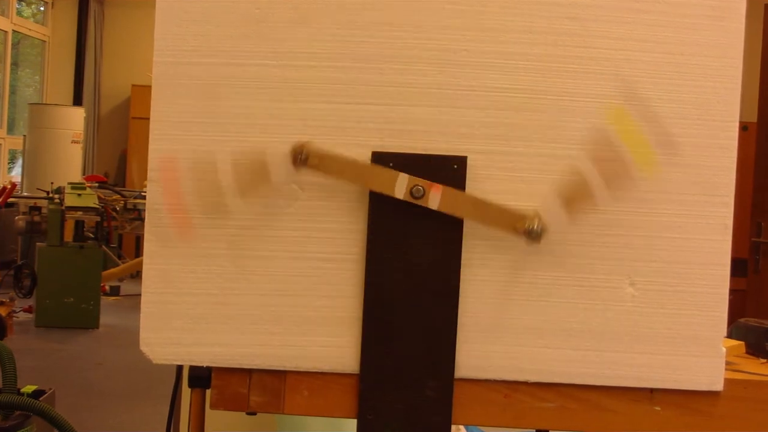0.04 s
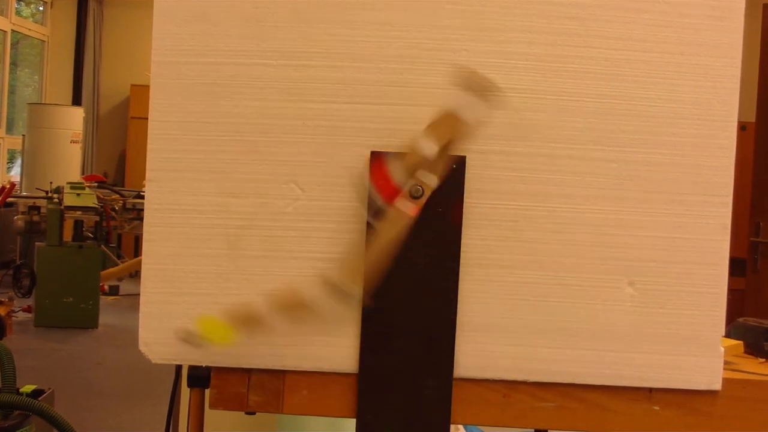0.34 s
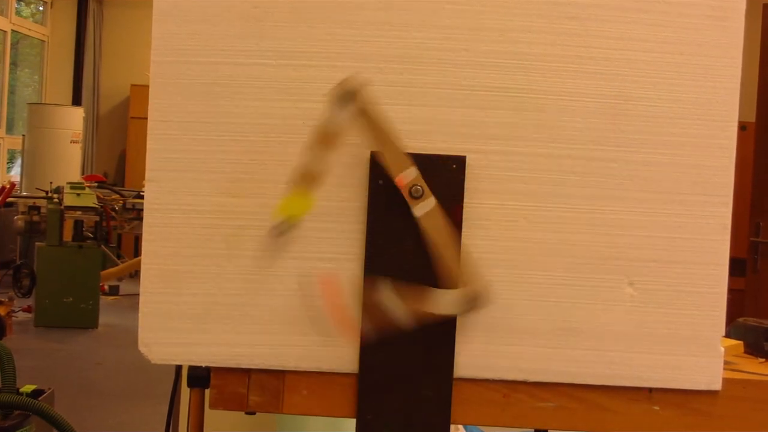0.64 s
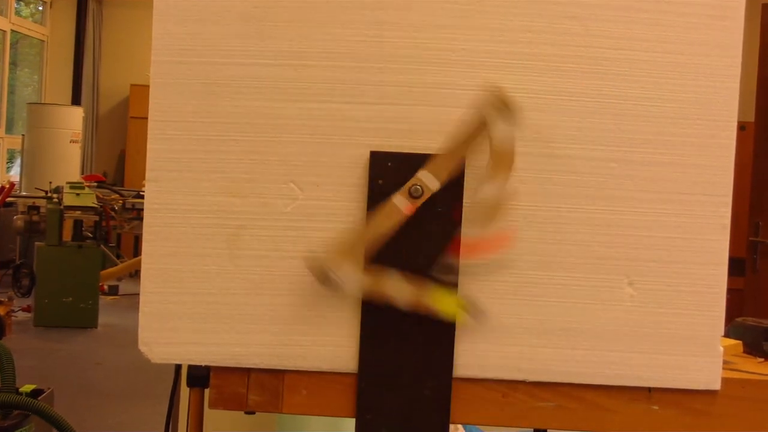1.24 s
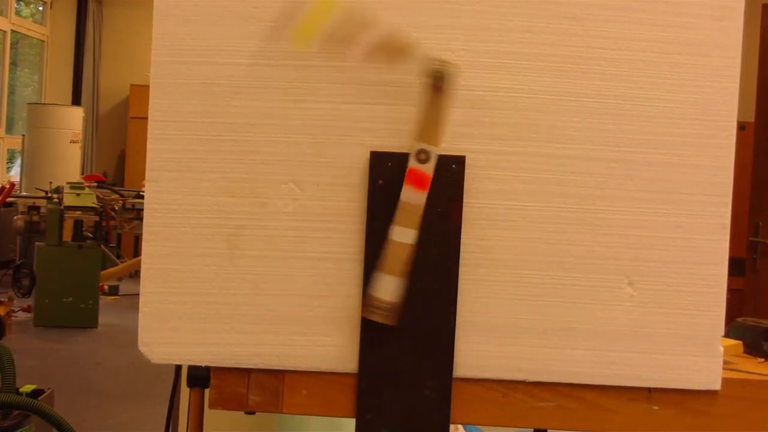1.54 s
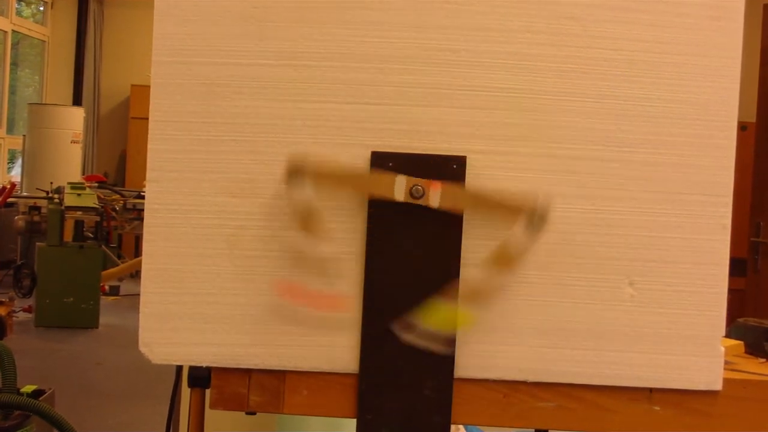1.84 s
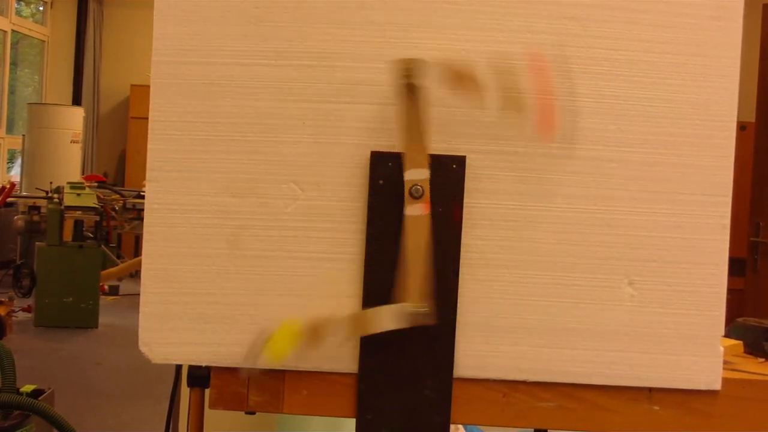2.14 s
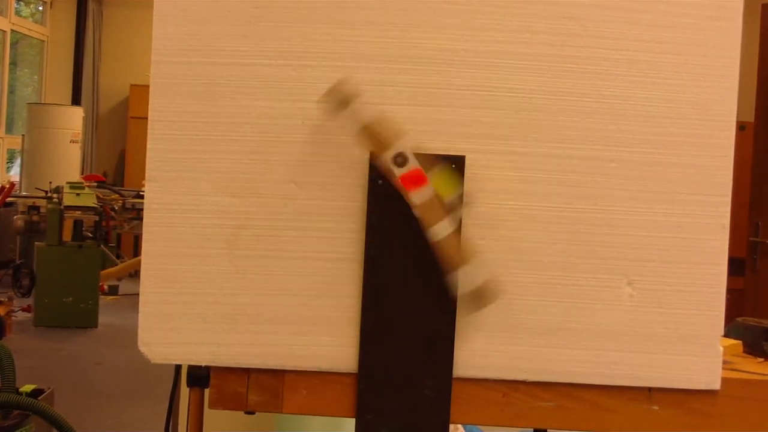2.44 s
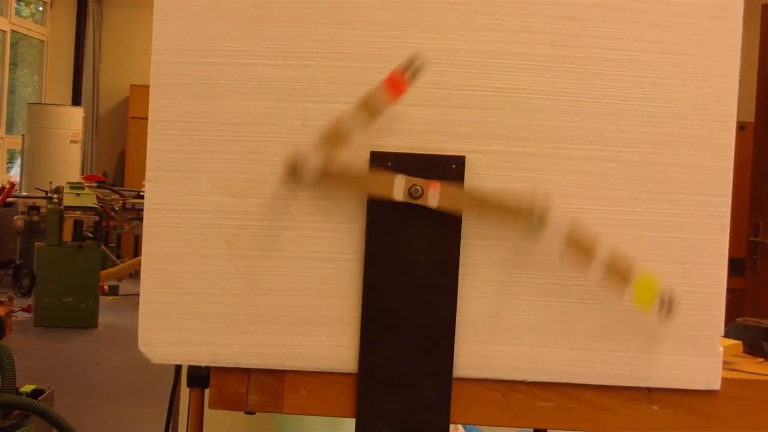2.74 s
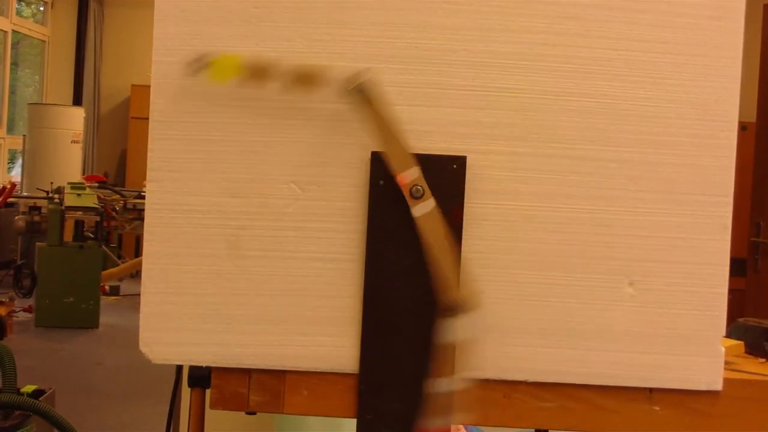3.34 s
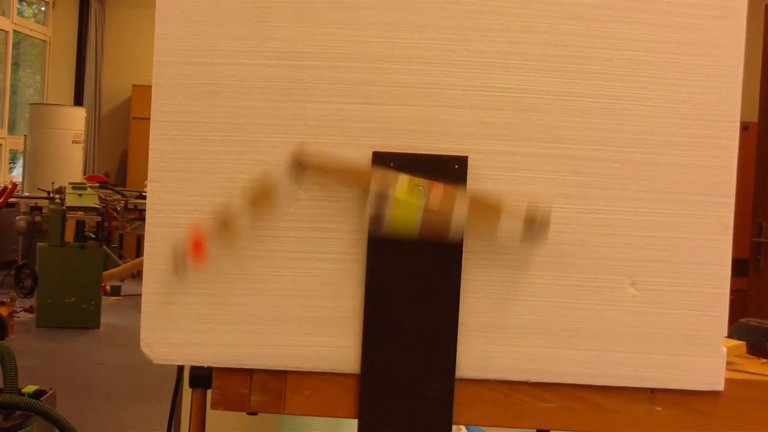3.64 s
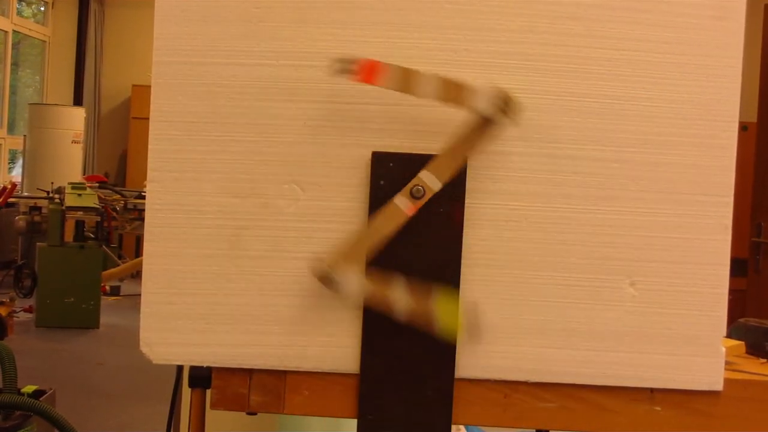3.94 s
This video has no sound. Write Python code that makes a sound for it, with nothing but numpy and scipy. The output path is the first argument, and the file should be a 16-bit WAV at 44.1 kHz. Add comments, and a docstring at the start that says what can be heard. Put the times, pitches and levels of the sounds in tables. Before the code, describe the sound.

A swinging wooden double pendulum ticks and rubs irregularly in a reverberant workshop. It opens on a fading bump, with a low thump at 0.2 seconds. A hollow knock at 0.8 precedes one hard, chattering clack at 0.9. Dull bench thumps come around 1.6 to 1.7. Lighter clicks cluster near 2.4 and 3 seconds, then thin out, leaving a brief rub over faint rumble, hiss, hum and a thin whine.

```python
"""Wooden double pendulum in a workshop

The pendulum swings in a reverberant room: its loose joints tick and rub, its stand rings hollow
when jolted, and the arms clack together once, hard, with a brief chatter. A bump is dying away
at the start and soft thumps shake the bench. Behind are rumble, hiss, hum, a whine and a flutter."""
import sys
import numpy as np
from scipy import signal
from scipy.fft import rfft, irfft
from scipy.io import wavfile

SR = 44100
rng = np.random.default_rng(int(sys.argv[2]) if len(sys.argv) > 2 else 0)


def int16_out(signal):
    """Quantize to a 16-bit WAV file."""
    q = np.round(np.clip(np.atleast_2d(signal).T, -1, 1) * 32767)
    wavfile.write(sys.argv[1], SR, q.astype(np.int16))


N = 176400
TIME = np.arange(N) / SR
HZ = np.maximum(np.arange(N // 2 + 1) * SR / N, 1)


def from_db(db):
    """Decibels to gain."""
    return 10 ** (np.asarray(db) / 20)


def unit(x):
    """Scale to an energy of one."""
    return x / np.sqrt(np.sum(x ** 2) + 1e-20)


def at_hz(points, hz):
    """Read a curve on a log-frequency axis."""
    f, value = np.transpose(points)
    return np.interp(np.log(hz), np.log(f), value)


def colour(x, spectrum):
    """Apply an EQ curve."""
    return irfft(rfft(x) * from_db(at_hz(spectrum, HZ)), N)


def noise(spectrum):
    """Coloured noise, rms one."""
    x = colour(rng.standard_normal(N), spectrum)
    return x / x.std()


def fade(t60):
    """Exponential decay, 60 dB down after t60 seconds."""
    return np.exp(-np.minimum(np.log(1000) * TIME / t60, 40))


def widen(mid, side):
    """Mid and side to left and right."""
    return np.array([mid + side, mid - side])


def pan(stereo, right_db):
    """Raise the right channel and lower the left by as much."""
    return stereo * from_db([[-right_db], [right_db]])


def ringing(modes, size=N, uneven_db=0):
    """Decaying sines of alternating sign; uneven_db varies them as if the blow landed elsewhere."""
    t, out = TIME[:size], 0
    for k, (hz, db, t60) in enumerate(modes):
        envelope_db = db + uneven_db * rng.standard_normal() - np.minimum(60 * t / t60, 300)
        out = out + (-1) ** k * from_db(envelope_db) * np.sin(2 * np.pi * hz * t)
    return out


def strikes(hits, modes, crack, crack_t60, crack_db, ring_db, size):
    """Each contact is a noise crack plus the body's modes, dulled by the softness of the touch."""
    out = np.zeros(N + size)
    grain, decay = noise(crack), fade(crack_t60)[:size]
    for onset_s, db, cutoff_hz in hits:
        burst = from_db(crack_db) * unit(np.roll(grain, rng.integers(N))[:size] * decay)
        ring = from_db(ring_db) * unit(ringing(modes, size, uneven_db=2.5))
        softness = signal.butter(2, cutoff_hz, fs=SR)
        start = int(onset_s * SR)
        out[start:start + size] += from_db(db) * signal.lfilter(*softness, burst + ring)
    return out[:N]


# Room tone, heavy in the lows: f/Hz, relative level/dB
ROOM_TONE_EQ = [(20, 26.5), (35, 28.5), (70, 25), (130, 14), (250, 13), (450, 10), (700, 7), (1200, 5.5),
                (2200, 2), (4000, -4), (7000, -6.5), (10000, -8.5), (15000, -11)]
# Hiss at the sides: f/Hz, relative level/dB
SIDE_HISS_EQ = [(40, 9), (120, 8), (300, 6.5), (1000, 4.5), (3000, -0.5), (7000, 6), (15000, -0.5)]
def room_tone(rumble_db=-49, hiss_db=-61.5):
    """A steady bed: rumble in the centre, faint hiss for width."""
    return widen(from_db(rumble_db) * noise(ROOM_TONE_EQ), from_db(hiss_db) * noise(SIDE_HISS_EQ))


# Whine partials: f/Hz, rms level/dB
WHINE_TONES = [(3934, -71.5), (7867, -63.5), (11800, -75.5)]
# Hum tone: f/Hz, rms level/dB
HUM_TONES = [(179.6, -62)]
def electronics():
    """A thin electronic whine over a low hum, all steady sines."""
    return sum(np.sqrt(2) * from_db(db) * np.sin(2 * np.pi * (hz * TIME + rng.random()))
               for hz, db in WHINE_TONES + HUM_TONES)


# Rhythm of each pulse train: rate/Hz, first t/s, polarity
FLUTTER_RHYTHM = [(29.97, .0112, 1), (29.97, .0245, -1), (29.917, .0018, -1), (29.917, .0182, -1)]
# Pulse shape of each train: peak level/dB, rise/s, fall/s
FLUTTER_PULSES = [(-38.5, 0.00014, 0.0015), (-37, 0.00047, 0.0015), (-45, .001, 0.00042),
                  (-43.5, 0.0013, 0.00042)]
def flutter(uneven_db=2.0):
    """Two cycles, each twitching softly twice a turn, slide slowly towards each other."""
    t, out = TIME[:SR // 20], 0
    for (rate, first, polarity), (db, rise, fall) in zip(FLUTTER_RHYTHM, FLUTTER_PULSES):
        onsets = (np.arange(first, TIME[-1], 1 / rate) * SR).astype(int)
        clicks = np.zeros(N)
        clicks[onsets] = polarity * from_db(db + uneven_db * rng.standard_normal(len(onsets)))
        pulse = (1 - np.exp(-t / rise)) ** 2 * np.exp(-t / fall)
        out = out + signal.fftconvolve(clicks, pulse / pulse.max())[:N]
    low_cut = signal.butter(1, 20, "high", fs=SR, output="sos")
    return signal.sosfilt(low_cut, out)


# Reverb decay: f/Hz, t60/s
REVERB_DECAY = [(100, 0.9), (700, 0.74), (2000, 0.86), (5000, .82), (7500, 0.77), (10500, .5), (15000, 0.7)]
# Reverb tone: f/Hz, level/dB
REVERB_EQ = [(60, 2.5), (300, 3.5), (1000, 2), (2500, -3), (5000, -1), (7000, -1.5), (11000, -4),
             (14000, -9)]
# Reverb width: f/Hz, side level re mid/dB
REVERB_WIDTH = [(100, -22), (500, -20), (1500, -28), (4000, -36), (6500, -10), (10000, -7)]
def workshop_reverb(send, build_s=0.009):
    """Reflections build into a diffuse tail that dies sooner in the high treble."""
    centres_hz = np.linspace(10, 122, 20) ** 2
    band_of_bin = np.rint(np.interp(np.log(HZ), np.log(centres_hz), np.arange(len(centres_hz))))
    spectrum = rfft(rng.standard_normal((2, N))) * from_db(at_hz(REVERB_EQ, HZ))
    build_up = 1 - np.exp(-(TIME / build_s) ** 2)
    tail = 0
    for k, hz in enumerate(centres_hz):
        band = irfft(spectrum * (band_of_bin == k), N)
        tail = tail + band * unit(fade(at_hz(REVERB_DECAY, hz)) * build_up)
    mid, side = signal.fftconvolve(send[None], tail, axes=1)[:, :N]
    return widen(mid, colour(side, REVERB_WIDTH))


# Lingering modes of the bump: f/Hz, level/dB, t60/s
BUMP_MODES = [(77.2, -34.5, 1.05), (94, -52, 0.46), (178, -59, 0.43), (250, -40, 0.66), (357, -51, .6),
              (437.5, -44, 0.53), (476, -52, 0.75), (690, -54, .8), (867, -48, 1.4), (964, -51, 0.53),
              (985, -48.5, 0.53), (1068, -49, 0.37)]
# Its dark wash in the room: f/Hz, relative level/dB
BUMP_WASH_EQ = [(40, 2), (100, 2), (350, -6), (600, -8), (1000, -10.5), (1500, -16.5), (2800, -20.5),
                (5000, -27), (14000, -46)]
def bump_tail(wash_db=-37.5, wash_t60=1, fade_in_s=0.0013):
    """The ring and room wash of a bump, already dying away as the scene opens."""
    wash = from_db(wash_db) * noise(BUMP_WASH_EQ) * fade(wash_t60)
    return (ringing(BUMP_MODES) + wash) * (1 - np.exp(-TIME / fade_in_s))


# Thump cues: t/s, level/dB, low-pass f/Hz
BENCH_HITS = [(.225, -1.5, 100), (1.6148, -1, 1300), (1.733, 0, 97.2), (1.6, -2.5, 70), (3, -17, 46.3)]
# Boom of the bench: f/Hz, relative level/dB, t60/s
BENCH_BODY = [(60.7, 6, 0.17), (80, -0.5, 0.39), (155, -8, 0.3), (176, -0.5, 0.2), (256.2, -9, 0.26),
              (320, -3, 0.21), (387, -11, 0.76), (421, -17, 0.47), (572, -22, 0.25), (775, -24, 0.18)]
# Dull attack: f/Hz, relative level/dB
BENCH_THUD_EQ = [(30, 2), (70, 1), (170, 2), (350, 0), (550, -7), (800, -11), (1100, -25), (4000, -50)]
def bench_thumps():
    """Heavy, soft bumps stir the bench's low modes."""
    return strikes(BENCH_HITS, BENCH_BODY, BENCH_THUD_EQ,
                   crack_t60=0.11, crack_db=-4, ring_db=-3.5, size=SR)


# Fader ride of the rub: t/s, level/dB
RUB_RIDE = [(0, -59), (.6, -65.5), (.72, -59), (.85, -58.5), (1.25, -62.5), (1.5, -63), (2.1, -64.5),
            (2.35, -57.5), (2.42, -51), (2.52, -59), (2.7, -65), (3.2, -81), (3.74, -79), (3.85, -56),
            (3.92, -74), (4, -77)]
# Dry friction tone: f/Hz, relative level/dB
RUB_EQ = [(300, -5), (1200, -7.5), (1800, 0.5), (2650, -4), (3200, -3.5), (4500, -8), (7000, -10),
          (9000, -14), (15000, -22)]
def pivot_rub(slips_per_s=550, spread_db=4):
    """Dry wood turns on the pivots in dense, tiny slips."""
    slips = (rng.random(N) < slips_per_s / SR) * rng.choice([-1, 1], N)
    strengths = from_db(spread_db * rng.standard_normal(N))
    grains = colour(slips * strengths, RUB_EQ)
    return grains / grains.std() * from_db(np.interp(TIME, *np.transpose(RUB_RIDE)))


# Knock cues: t/s, level/dB
STAND_HITS = [(.7775, -9), (.8785, -21.5), (1.093, -22), (1.5655, -23)]
# Hollow body of the stand: f/Hz, relative level/dB, t60/s
STAND_BODY = [(437, -25, .08), (695, 2, 0.076), (724, -0.5, .05), (790, -2.5, .045), (873, -8.5, 0.093)]
def stand_knocks():
    """Each jolt rings the same hollow note from the stand."""
    ring = unit(ringing(STAND_BODY))
    return sum(from_db(db) * np.interp(TIME - onset_s, TIME, ring, left=0) for onset_s, db in STAND_HITS)


# Tick cues: t/s, level/dB, low-pass f/Hz
JOINT_HITS = [(.097, -23.5, 4000), (.187, -23, 3000), (.303, -21, 3000), (.542, -23.5, 4000),
              (.649, -18.5, 5500), (.657, -27, 8000), (.683, -21, 3500), (.700, -24, 5000),
              (.703, -21.5, 16000), (.7075, -30, 10000), (.713, -26, 12000), (.723, -29, 8000),
              (.767, -25, 3000), (.7745, -10.5, 3000), (.7765, -15.5, 6360), (.781, -21, 15000),
              (.804, -28, 5950), (1.089, -18, 2000), (1.099, -14, 3020), (1.157, -20, 3500),
              (1.230, -24, 3000), (1.251, -21, 5000), (1.276, -24, 3500), (1.292, -29, 3000),
              (1.348, -24.5, 3000), (1.361, -36, 5960), (1.432, -27.5, 7000), (1.5585, -15, 7940),
              (1.5655, -17.5, 9000), (1.567, -16, 900), (1.573, -28, 11000), (1.681, -21, 3000),
              (2.316, -17.5, 6150), (2.384, -19.5, 5030), (2.409, -18.5, 4000), (2.428, -17.5, 3000),
              (2.447, -21, 6000), (2.479, -30, 6000), (2.499, -21, 3500), (2.935, -25.5, 6000),
              (2.943, -22.5, 4500), (2.951, -21.5, 4000), (3.025, -26, 3000)]
# Small ring of a joint: f/Hz, relative level/dB, t60/s
JOINT_BODY = [(900, -5.5, 0.051), (1774, -4, 0.036), (2440, 1, 0.022), (2620, -1, 0.028), (3180, -9, 0.019),
              (3640, -3, 0.03), (4340, -7, 0.037), (6000, -5, .02), (6950, -3, 0.029)]
# Tick attack: f/Hz, relative level/dB
JOINT_CRACK_EQ = [(300, 0.5), (1200, -6.5), (2600, 0), (5000, -5), (7500, -3), (10500, -4.5), (15000, -7)]
def joint_ticks():
    """The loose joints tick lightly as the load on the pivots reverses."""
    return strikes(JOINT_HITS, JOINT_BODY, JOINT_CRACK_EQ,
                   crack_t60=0.037, crack_db=1, ring_db=-6.5, size=4096)


# Contacts within the one clack: t/s, level/dB, low-pass f/Hz
ARM_HITS = [(.8775, -1.5, 1930), (.8791, -5.5, 9000), (.8826, -7, 13900), (.8857, -1.5, 18000),
            (.8899, -17, 16000), (.8963, -23, 16000)]
# Tight, bright ring of the arms: f/Hz, relative level/dB, t60/s
ARM_BODY = [(1080, -11, 0.011), (1810, 0, 0.013), (2612, -8.5, 0.017), (3480, -9, 0.0094),
            (4340, -10, 0.0089), (5020, -6, 0.011), (5500, -9, 0.014), (6860, -3, 0.013), (6950, 3, 0.014),
            (7155, 1.5, 0.018), (8860, -6, .012), (10440, -5, 0.0073), (10820, -0.5, 0.0082),
            (12430, -1.5, .01)]
# Clack attack: f/Hz, relative level/dB
ARM_CRACK_EQ = [(100, 0.5), (400, -5.5), (1000, -6), (1800, -4.5), (3000, -4.5), (6000, -2), (7000, 3),
                (8300, -5), (11000, 4), (12000, -6), (15000, -14)]
def arm_clack():
    """The arms collide and chatter, hard wood on wood."""
    return strikes(ARM_HITS, ARM_BODY, ARM_CRACK_EQ,
                   crack_t60=0.015, crack_db=-0.5, ring_db=-5, size=8192)


# Width of the direct sound, mostly treble: f/Hz, side level re mid/dB
DIRECT_WIDTH = [(200, -39), (1500, -23), (5000, -25), (12000, -9)]
def near_reflection(direct, lag_s=0.0012):
    """A near reflection sets left and right apart around the direct sound."""
    reflection = np.interp(TIME - lag_s, TIME, colour(direct, DIRECT_WIDTH))
    return widen(direct, reflection)


def scene(clack_send_db=-1, joint_send_db=-4, stand_send_db=-7, bench_send_db=-4):
    """Pendulum and bench just right of centre, the workshop around them, the steady bed behind."""
    clack = arm_clack()
    joints = joint_ticks() + pivot_rub()
    knocks = stand_knocks()
    thumps = bench_thumps()
    send = (from_db(clack_send_db) * clack + from_db(joint_send_db) * joints
            + from_db(stand_send_db) * knocks + from_db(bench_send_db) * thumps)
    reverb = workshop_reverb(send)
    direct = near_reflection(clack + joints + knocks + thumps + bump_tail())
    bed = electronics() + flutter() + room_tone()
    return pan(bed, right_db=0.25) + pan(reverb, right_db=-0.1) + pan(direct, right_db=0.57)


def record(dry):
    """A steep high cut on the whole mix."""
    cutoff_hz = 15300
    return signal.sosfilt(signal.ellip(12, .1, 80, cutoff_hz, fs=SR, output="sos"), dry)


dry = scene()
out = record(dry)
int16_out(out)
```